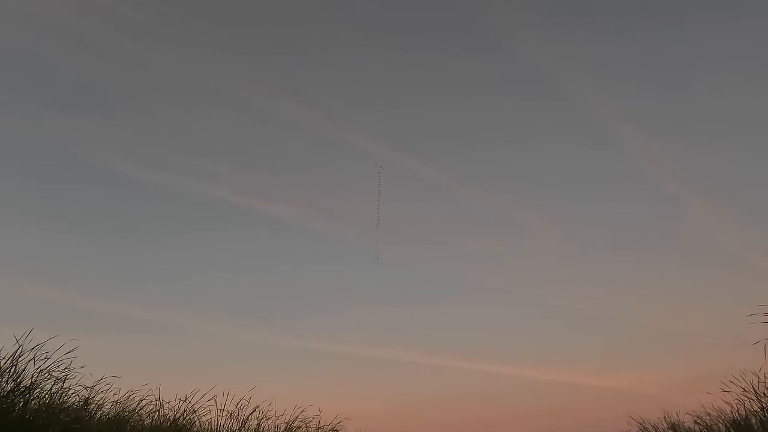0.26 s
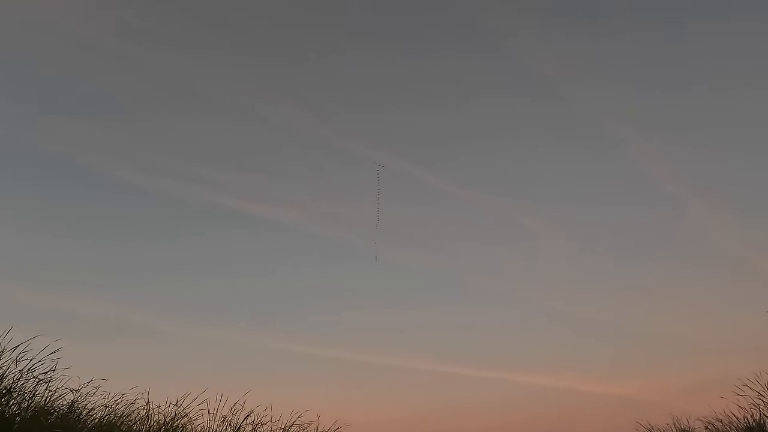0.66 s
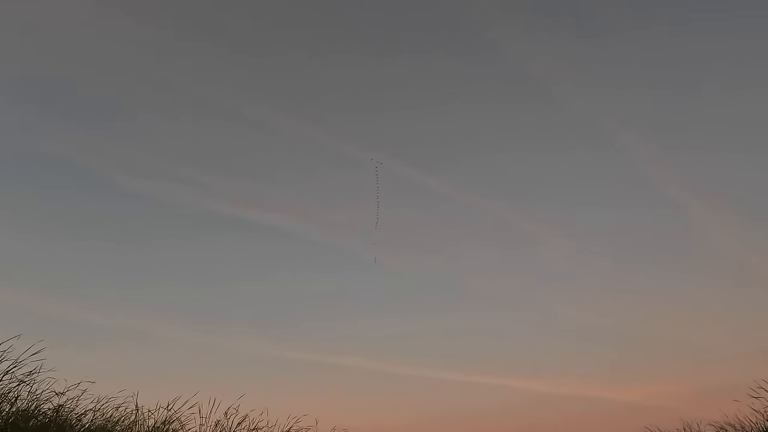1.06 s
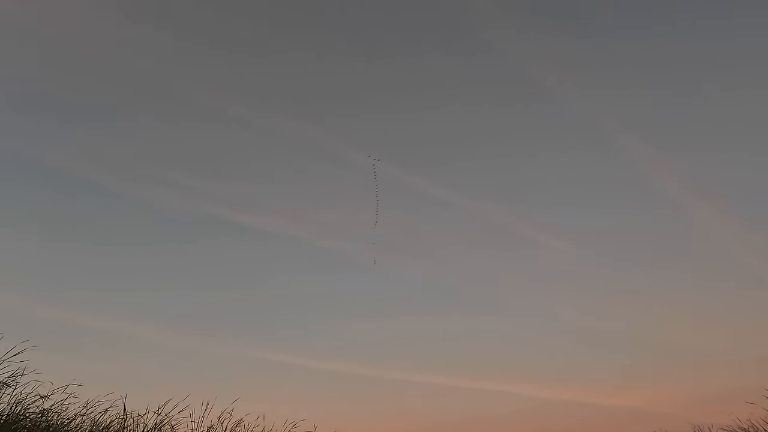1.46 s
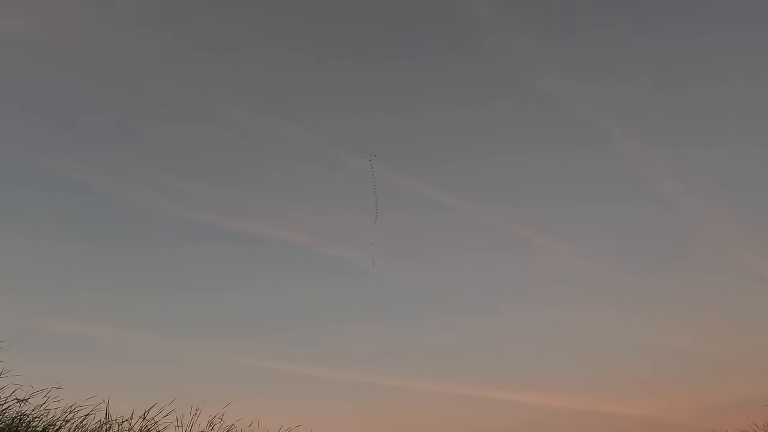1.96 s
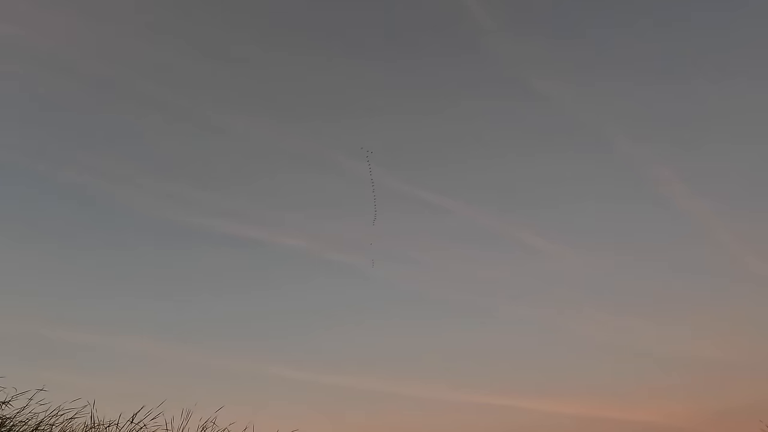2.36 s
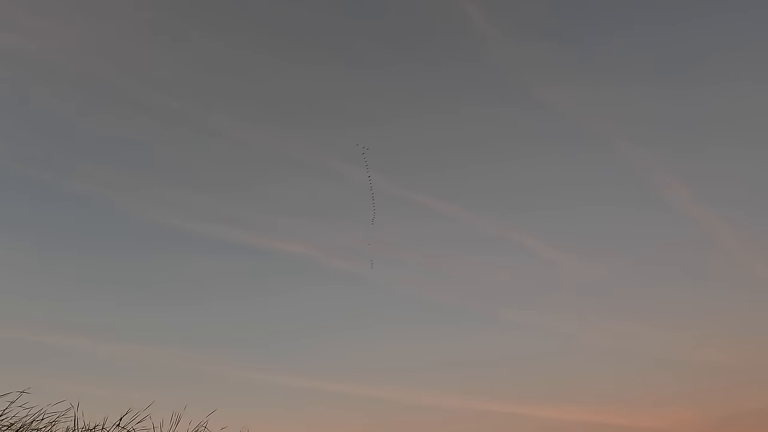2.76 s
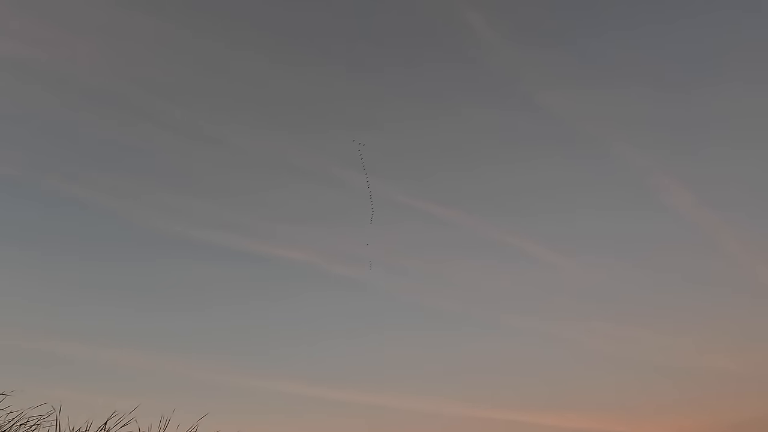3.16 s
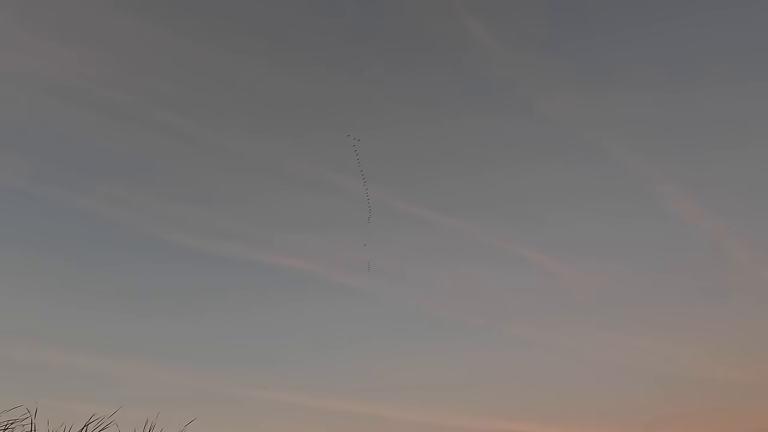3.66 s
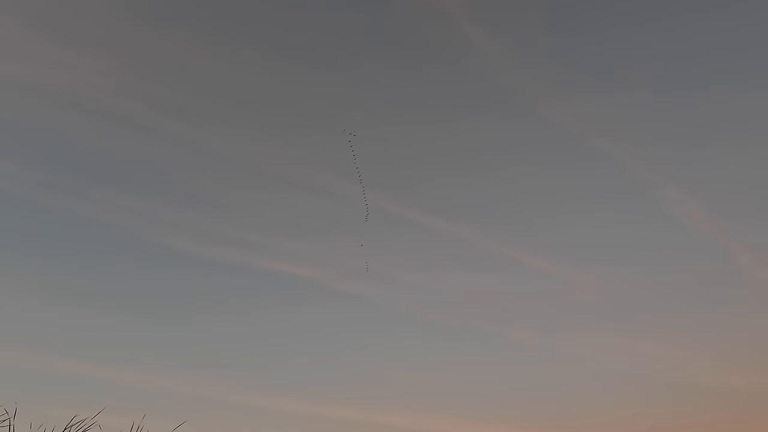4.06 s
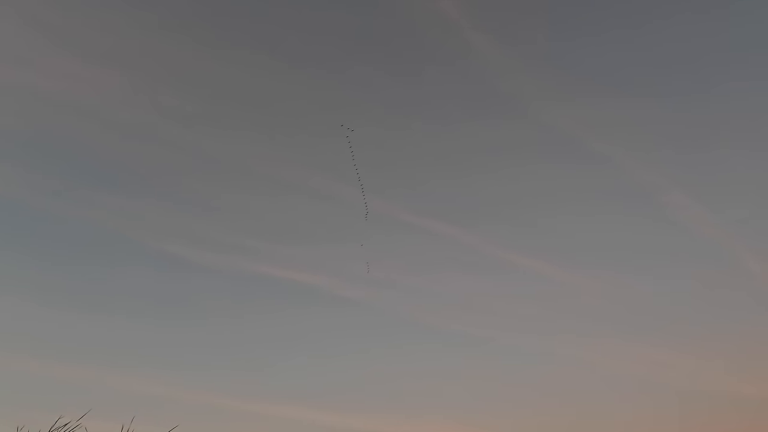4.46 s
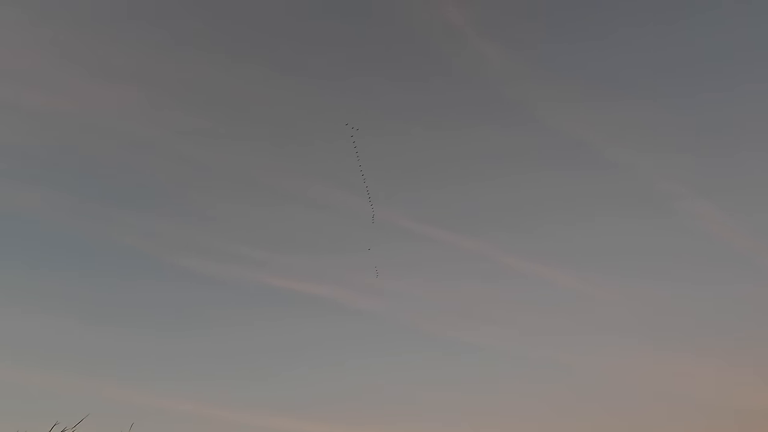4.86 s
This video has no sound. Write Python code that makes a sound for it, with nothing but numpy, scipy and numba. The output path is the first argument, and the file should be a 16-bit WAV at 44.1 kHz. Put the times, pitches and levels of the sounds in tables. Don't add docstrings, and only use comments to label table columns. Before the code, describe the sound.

Outdoors on an open marsh, wind rumbles and thumps on a handheld stereo microphone, stronger on the right. Faint far goose gabble and a cluck come first, then from about half a second nearer geese honk repeatedly until the end, clear short notes with raspy edges and a faint echo. Soft hiss lies beneath, with tiny grip creaks.

```python
import sys
import numpy as np
from scipy import signal
from scipy.fft import rfft, irfft
from scipy.io import wavfile
from scipy.ndimage import uniform_filter1d
from numba import njit

SR = 44100
rng = np.random.default_rng(int(sys.argv[2]) if len(sys.argv) > 2 else 0)


def wav_record(signal):
    frames = np.transpose(np.atleast_2d(signal))
    bounded = np.clip(frames, -1, 1)
    quanta = np.round(bounded * 32767).astype(np.int16)
    wavfile.write(sys.argv[1], SR, quanta)


def ratio_of_db(decibels):
    return 10 ** (np.asarray(decibels, float) / 20)


N = 224557
T = np.arange(N) / SR


def unit(x):
    return x / np.sqrt(np.mean(x ** 2))


def band(x, lo_hz, hi_hz, order=2):
    return signal.sosfilt(signal.butter(order, [lo_hz, hi_hz], "band", fs=SR, output="sos"), x)


def walk(rate_hz):
    hold = int(SR / rate_hz)
    steps = np.repeat(rng.standard_normal(N // hold + 1), hold)
    return unit(uniform_filter1d(uniform_filter1d(steps, hold), hold)[:N])


def sides(pan_db):
    return ratio_of_db(np.array([[pan_db], [-pan_db]]) / 2)


def played(table, fade_s):
    time_s, *columns = np.transpose(table)
    span = slice(int(time_s[0] * SR), min(int(time_s[-1] * SR), N))
    t = T[span]
    edge = np.clip(np.minimum(t - time_s[0], time_s[-1] - t) / fade_s, 0, 1)
    return span, [np.interp(t, time_s, c) for c in columns], np.sin(np.pi / 2 * edge) ** 2


# (share of note [0-1], pitch re crest [ratio], 1st partial [dB], 2nd [dB], overtones [dB])
STEPPED_SHAPE = [(0, .93, -16.5, -8, -47), (.2, 0.94, -8.5, -1, -41.5), (.36, 0.98, -3, -3, -40),
                 (.53, 1, 3, -5, -37.5), (.66, .925, -4.5, -2.5, -28.5), (.85, .905, -6, -4.5, -45),
                 (1, .8, -28.5, -20.5, -54.5)]
ARCHED_SHAPE = [(0, .8, -32, -10, -44), (.14, .92, -12, -3.5, -32), (.26, .985, -6, -1, -36),
                (.38, 1, -3, -0.5, -38), (.55, 0.96, -4, -3, -28.5), (.8, .84, -20, -11, -37),
                (1, 0.68, -20, -18, -56)]
DOMED_SHAPE = [(0, .815, -29, -18, -62), (.28, .89, -4, -5, -32), (.45, .994, -17, -1, -39),
               (.62, 1, -17.5, -2, -40), (.83, .92, -8.5, -6.5, -28.5), (1, 0.86, -12.5, -19, -53)]
BROAD_SHAPE = [(0, .96, -29.5, -13.5, -54), (.16, .98, -6.5, 0, -32), (.5, 1, -2, 0, -28.5),
               (.75, .967, -5.5, -4, -30.5), (.88, .885, -19, -8, -28), (1, 0.83, -46, -38, -59)]
LEVEL_SHAPE = [(0, .93, -21.5, -10.5, -56.5), (.2, .988, -15, 0.5, -50), (.6, 1, -12.5, -2.5, -47),
               (.92, 0.98, -20, -2.5, -50.5), (1, .985, -35, -14, -52.5)]
SHORT_SHAPE = [(0, .925, -10.5, -5.5, -48.5), (.24, 0.98, -6.5, -1, -46.5), (.5, 1, -3.5, -1, -42),
               (.84, 0.97, -6, -3, -47.5), (1, .9, -25.5, -22, -59)]
RISING_SHAPE = [(0, .79, -29, -18, -54), (.16, .83, -14.5, -6, -46), (.27, .93, -11, -3, -42),
                (.38, 1, -10, -1, -39), (.55, 0.99, -23, -4.5, -48.5), (1, .998, -33.5, -19, -57.5)]
# (start [s], length [s], crest [Hz], level [dB], 1st partial lift [dB])
STEPPED_HONKS = [
    (.445, 0.15, 991.5, -53, -6.5),
    (1.401, 0.15, 995, -51.5, -3.5),
    (2.37, 0.15, 992, -54, 0.5),
    (3.332, .152, 991, -51.5, 0.5),
    (4.452, 0.14, 991.7, -46.5, 1),
]
ARCHED_HONKS = [
    (1.54, .125, 845, -68, -13),
    (4.378, .15, 1000, -46.5, -1),
]
DOMED_HONKS = [
    (.9, .145, 985, -48.5, 0),
]
BROAD_HONKS = [
    (1.075, .152, 939, -50, -2.5),
    (3.125, 0.15, 926.5, -47.5, 1),
]
LEVEL_HONKS = [
    (1.05, 0.092, 997, -51, 7),
    (2.659, 0.099, 980.5, -50.5, -5),
]
SHORT_HONKS = [
    (2.165, 0.059, 954.8, -54, -2.2),
    (4.1, .105, 1000, -53.5, 0),
]
RISING_HONKS = [
    (.79, .11, 957, -49.5, 0),
]
THIRD_LIFTS_DB = [
    5.2,
    9,
    12,
    10.7,
    16,
    25.4,
    18,
]


def clear_notes():
    voices = [(STEPPED_SHAPE, STEPPED_HONKS), (ARCHED_SHAPE, ARCHED_HONKS), (DOMED_SHAPE, DOMED_HONKS),
              (BROAD_SHAPE, BROAD_HONKS), (LEVEL_SHAPE, LEVEL_HONKS), (SHORT_SHAPE, SHORT_HONKS),
              (RISING_SHAPE, RISING_HONKS)]
    notes = []
    for (shape, rows), third_db in zip(voices, THIRD_LIFTS_DB):
        for start_s, length_s, crest_hz, db, lift_db in rows:
            scale = [length_s, crest_hz, 1, 1, 1]
            offset = [start_s, 0, db + lift_db, db, db]
            notes.append((np.array(shape) * scale + offset, third_db))
    return notes


# (partial [number], level re overtones [dB])
UPPER_PARTIALS = [(4, 6), (5, 4.5), (6, -4), (7, -30)]


def honks():
    out, waver, twinkle_db = np.zeros(N), walk(150), walk(60)
    for table, third_db in clear_notes():
        span, (hz, first_db, second_db, upper_db), edge = played(table, fade_s=.004)
        hz = uniform_filter1d(hz, size=450, mode="nearest")
        phase = 2 * np.pi * np.cumsum(hz * (1 + .002 * waver[span])) / SR
        glide = np.gradient(np.log(hz)) * SR
        glide_db = .6 * glide - 1.5 * np.abs(glide)
        partials = [(1, first_db), (2, second_db), (3, upper_db + third_db + glide_db)]
        partials += [(k, upper_db + db + glide_db) for k, db in UPPER_PARTIALS]
        note = 0
        for k, db in partials:
            own_db = .7 * k * np.roll(twinkle_db, 5000 * k)[span]
            note = note + ratio_of_db(db + own_db) * np.sin(k * phase + k * k)
        out[span] += np.sqrt(2) * note * edge
    return out


@njit
def svf(x, hz, width_hz):
    y, b, l = np.empty(len(x)), 0., 0.
    for i in range(len(x)):
        g, k = np.tan(np.pi * hz[i] / SR), width_hz / hz[i]
        v = (b + g * (x[i] - l)) / (1 + g * (g + k))
        b, l, y[i] = 2 * v - b, l + 2 * g * v, k * v
    return y


def pulses(rate_hz, uneven, arch, count):
    chance = rng.standard_normal((N // 60 + 2, 2))
    clock = np.cumsum(rate_hz / SR * (1 - arch * np.linspace(-1, 1, count) ** 2))
    at = np.interp(np.cumsum(np.exp(uneven * chance[:, 0])), clock, np.arange(count))
    keep = at < count - 2
    at, size, out = at[keep], ratio_of_db(20 * uneven * chance[keep, 1]), np.zeros(count)
    np.add.at(out, at.astype(int), size * (1 - at % 1))
    np.add.at(out, at.astype(int) + 1, size * (at % 1))
    return out


def throat(slaps, throat_hz, beak_db, effort_db):
    throat_width_hz, beak_hz, beak_width_hz, rasp_air_db = 304., 1840., 500., -29
    slaps = band(slaps, 660, 7300, order=3)
    low = svf(svf(slaps, throat_hz, throat_width_hz), throat_hz, 0.63 * throat_width_hz)
    high = band(svf(slaps, np.full(len(slaps), beak_hz), beak_width_hz), 1185, 2147, order=4)
    hoarse = ratio_of_db(rasp_air_db + 0.27 * effort_db) * unit(band(slaps, 3200, 5000))
    return unit(low) - ratio_of_db(beak_db) * unit(high) + hoarse


# (start [s], length [s], peak [dB], throat resonance [Hz], beak resonance [dB])
CHUFFS = [
    (.435, .048, -52, 1097, -11.5),
    (1.384, 0.043, -51.5, 1117, -12.5),
    (2.357, 0.04, -49.5, 1086, -16),
    (2.615, 0.073, -59, 1172, 0),
    (3.315, 0.045, -48.5, 1084, -9.5),
    (4.335, 0.087, -53.5, 1073, -3),
]
SWELLS = [
    (2.07, 0.12, -56.5, 1123, -3),
    (3.04, .11, -53.5, 1087, -10),
    (4.04, .07, -56, 1050, 1.5),
    (5.04, 0.052, -62.5, 1147, 0),
]
GROWLS = [
    (.85, .115, -53, 1152, -1.5),
    (4.105, 0.083, -63.5, 1400, -5.5),
    (4.445, .055, -48.5, 1065, -6),
]
DRONES = [
    (1.01, 0.192, -46.5, 1168, -9),
    (1.035, .075, -54, 1495, -3),
]
TRAILS = [
    (2.46, 0.14, -66.5, 1001, 5),
    (2.745, 0.088, -53.5, 1081, -5),
    (3.43, 0.085, -62.5, 995, 1.5),
    (4.185, 0.083, -54.5, 1055, -1),
]
FAR_RASPS = [
    (.21, 0.21, -75, 1300, 1.5),
    (.68, .08, -68.5, 1002, -3),
    (2.22, 0.1, -73, 1244, -1),
    (3.55, 0.17, -68.5, 1133, -0.5),
    (4.7, 0.12, -66, 1356, -8.5),
    (4.82, 0.085, -66, 1310, -4),
]
# (peak at share [0-1], start [dB], end [dB], throat sag [0-1], strain [dB])
RASP_RUNS = [
    (0.59, -9, -16, 0, -19.5),
    (.9, -25, -5.5, .04, 10),
    (0, -7, -6, 0.03, 1.5),
    (0.25, -4, -5, 0.05, 0),
    (0, -3.5, -10, 0, 4),
    (0.58, -8, -9, .14, -2),
]
# (rate [Hz], unevenness [0-1], arch of rate [0-1])
RASP_BEATS = [
    (276, .045, 0),
    (240, .07, .04),
    (244, .035, .06),
    (210, .022, .04),
    (255, .07, .05),
    (235, .035, .12),
]


def rasps():
    out, grain_db, slip = np.zeros(N), walk(70), np.cumsum(walk(45)) / SR
    kinds = [CHUFFS, SWELLS, GROWLS, DRONES, TRAILS, FAR_RASPS]
    for rows, run, (rate_hz, uneven, arch) in zip(kinds, RASP_RUNS, RASP_BEATS):
        peak, start_db, end_db, sag, strain_db = run
        peak = np.clip(peak, .05, .95)
        for s, length_s, top_db, top_hz, beak_db in rows:
            table = [(s, top_db + start_db, top_hz * (1 + sag * peak)),
                     (s + peak * length_s, top_db, top_hz),
                     (s + length_s, top_db + end_db, top_hz * (1 - sag * (1 - peak)))]
            span, (db, throat_hz), edge = played(table, fade_s=.006 + .12 * length_s)
            slide = np.exp(2j * np.pi * (top_hz % rate_hz * T[span] + 18 * slip[span]))
            slaps = signal.hilbert(pulses(rate_hz, uneven, arch, len(db))) * slide
            voice = throat(slaps.real, throat_hz, beak_db, effort_db=db + 55 + strain_db)
            out[span] += ratio_of_db(db + 2 * grain_db[span]) * edge * voice
    late = np.interp(T - .0031 - .00013 * walk(38), T, out)
    return .75 * (out + .85 * late)


def gabble():
    total = 0
    for rate_hz in (215, 250, 285):
        slaps = pulses(rate_hz, .1, 0, N)
        voice = throat(slaps, 1200 + 130 * walk(4.9), beak_db=-8.0, effort_db=-23.0)
        total = total + voice * ratio_of_db(4 * walk(12))
    return ratio_of_db(-78) * unit(total)


def ring(start_s, db, hz, t60_s):
    t = np.clip(T - start_s, 0, 1)
    decay = np.exp(-np.log(1000) * t / t60_s)
    return ratio_of_db(db) * np.sin(2 * np.pi * hz * t) * decay * (1 - np.exp(-t / (0.037 * t60_s)))


# (time [s], peak [dB], pitch [Hz])
CLUCKS = [
    (0.034, -49, 1607),
    (0.6676, -55, 2060),
    (0.7247, -73.5, 1994),
]


def flock():
    lag_s, pan_db, echo_db, echo_t60_s = 4e-5, -2.05, -17, 0.46
    clucks = sum(ring(s, db - 2, hz, .04) for s, db, hz in CLUCKS)
    birds = honks() + rasps() + gabble() + clucks
    turn = np.exp(1j * np.pi * lag_s * np.fft.rfftfreq(N, 1 / SR) * np.array([[-1], [1]]))
    direct = irfft(rfft(birds) * turn, N) * sides(pan_db)
    t = T[:SR // 2]
    tail = rng.standard_normal((2, len(t))) * np.exp(-np.log(1000) * t / echo_t60_s)
    tail = tail * np.minimum(t / 0.066, 1)
    echo = signal.fftconvolve(birds[None], tail / np.sqrt(np.sum(tail ** 2) / 2), axes=1)[:, :N]
    return direct + ratio_of_db(echo_db) * echo


# (time [s], peak [dB], half length [s])
GUSTS = [(0.064, -35, 0.03), (0.169, -28.5, 0.049), (0.279, -40.5, .05), (0.418, -26.5, .03),
         (0.524, -36.5, 0.054), (0.643, -25, 0.024), (0.857, -36, 0.12), (1.092, -40.5, 0.08),
         (1.336, -34.5, 0.038), (1.44, -35, 0.039), (1.685, -37.5, 0.076), (1.976, -41, 0.081),
         (2.21, -34, .04), (2.555, -41.5, .06), (2.757, -45.5, 0.11), (2.974, -35, 0.044),
         (3.206, -39.5, 0.13), (3.439, -36.5, 0.072), (3.687, -32, 0.085), (3.875, -36.5, 0.025),
         (4.076, -49, 0.091), (4.179, -45.5, 0.03), (4.461, -43, .1), (4.634, -35.5, .03),
         (4.816, -40.5, 0.08), (5.033, -36, 0.056)]
# (time [s], level [dB], push [ms], press over suck
THUMPS = [
    (0.0, -35, 20, -1.1),
    (5.09, -28.5, 26, 1.127),
    (.459, -20.5, 4.9, -0.53),
    (0.612, -15.5, 6.2, 0.12),
    (0.638, -23.5, 7.8, -1.63),
    (0.786, -17, 4.9, -0.53),
    (1.851, -23, 17.2, -1.77),
    (2.201, -36, 22, 0.4),
    (2.379, -32, 12, 2.05),
]


def wind():
    lull_db, pan_db = -47, -6.5
    flutter_db, flutter_follows, flicker_db = -71, 0.52, 3.5
    shake_db, shake_db_per_ms, shake_s = -27, -0.66, 0.027
    gust = ratio_of_db(lull_db) + sum(ratio_of_db(db) * np.exp(-((T - s) / half_s) ** 2) for s, db, half_s in GUSTS)
    gust_db = 20 * np.log10(gust)
    deep = band(rng.standard_normal(N + SR), 5, 40, order=1)[SR:]
    deep = deep / (np.abs(signal.hilbert(unit(deep))) + .3)
    swings = unit(deep) * np.minimum(gust, ratio_of_db(-31))
    swings = signal.sosfiltfilt(signal.butter(5, 54, fs=SR, output="sos"), swings)
    flutter, own = (unit(band(rng.standard_normal(N), 66, 165, order=3)) for _ in range(2))
    sides_apart = .25 * own * np.array([[1], [-.5]])
    stir_db = flutter_db + flutter_follows * (gust_db - gust_db.mean())
    stir = ratio_of_db(stir_db + flicker_db * walk(14))
    pushes = 0
    for s, db, push_ms, press in THUMPS:
        u = (T - s) / (push_ms / 1000)
        pushes = pushes + ratio_of_db(db) * (u + press * (.5 - u * u)) * np.exp(-u * u)
        stir = stir + ratio_of_db(db + shake_db + shake_db_per_ms * push_ms) * np.exp(-((T - s) / shake_s) ** 2)
    return (swings + pushes + stir * (flutter + sides_apart)) * sides(pan_db)


def over_hz(hz, table):
    table_hz, value = np.transpose(table)
    return np.interp(np.log(hz + 1), np.log(table_hz), value)


# (frequency [Hz], density [dB per Hz])
AIR_SPECTRUM = [(70, -7), (150, -6.5), (210, -8), (350, -16), (650, -20.5), (1000, -20.5), (1900, -23.5),
                (2400, -31), (4500, -35), (7300, -36), (8300, -48), (10500, -53), (12000, -56.5),
                (12600, -73)]
# (frequency [Hz], left minus right [dB])
AIR_PAN = [(150, -5.5), (500, -9), (1200, 0.5), (4000, 0), (8000, 6), (12000, 20)]
# (frequency [Hz], likeness of the ports [0-1])
AIR_ALIKE = [(150, 0.55), (500, 0.29), (1500, 0.78), (8000, 0.28)]


def air():
    hz = np.fft.rfftfreq(N, 1 / SR)
    alike = np.clip(over_hz(hz, AIR_ALIKE), 0, 1)
    mid, side = rfft(rng.standard_normal((2, N)))
    pair = np.sqrt(1 + alike) * mid + np.sqrt(1 - alike) * side * np.array([[1], [-1]])
    pan_db = over_hz(hz, AIR_PAN)
    shape_db = over_hz(hz, AIR_SPECTRUM) + np.array([pan_db, -pan_db]) / 2
    hiss = irfft(pair * ratio_of_db(shape_db) * (hz > 65), N)
    return ratio_of_db(-69 + .8 * walk(2.5)) * hiss / np.std(hiss.mean(axis=0))


# (time [s], peak [dB], pitch [Hz], left minus right [dB])
GRIP_TICKS = [
    (0.274, -66, 10860, 14),
    (0.3102, -76, 11000, 18.5),
    (0.4376, -70, 8570, 4),
    (0.9394, -78, 9750, 24),
    (1.1724, -76.5, 12000, 10.5),
    (3.243, -84, 12100, 14.5),
    (4.663, -79.5, 12200, 13),
]
GRIP_CREAKS = [
    (0.5277, -67, 5760, 2.0),
    (1.2406, -69, 6270, 1.5),
    (2.1894, -78, 5930, 3.0),
    (3.4141, -68, 5530, 0.0),
]
# (pitch [Hz], level [dB])
WHINE = [(9000, -113), (10740, -115), (12000, -117)]


def camera():
    creaks = sum(ring(s, db, hz, .004) * sides(pan_db) for s, db, hz, pan_db in GRIP_TICKS + GRIP_CREAKS)
    whine = sum(ratio_of_db(db + 3.0 * walk(30)) * np.sin(2 * np.pi * hz * T) for hz, db in WHINE)
    return creaks + whine


def scene():
    return flock() + wind() + air() + camera()


def low_pass(x):
    return signal.sosfilt(signal.butter(12, 12400, fs=SR, output="sos"), x)


def record(dry):
    return low_pass(dry)


dry = scene()
out = record(dry)
wav_record(out)
```